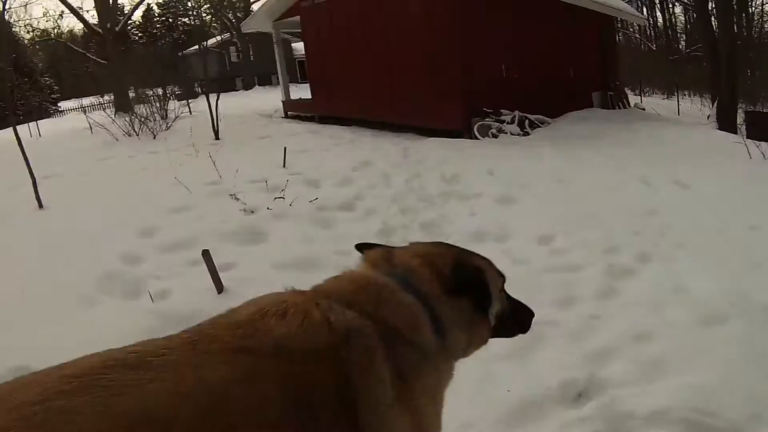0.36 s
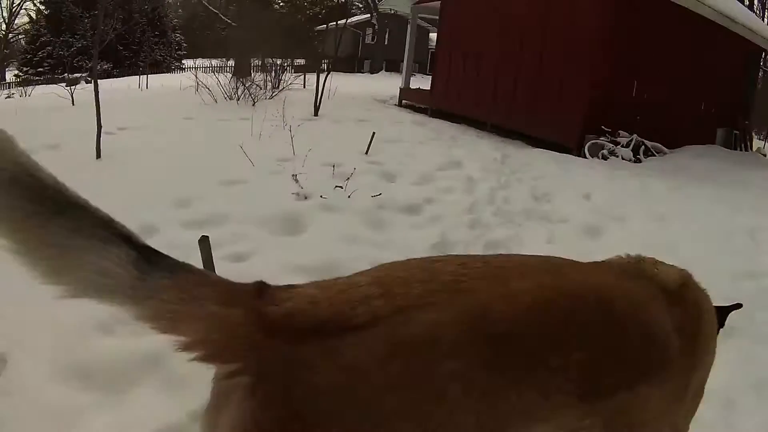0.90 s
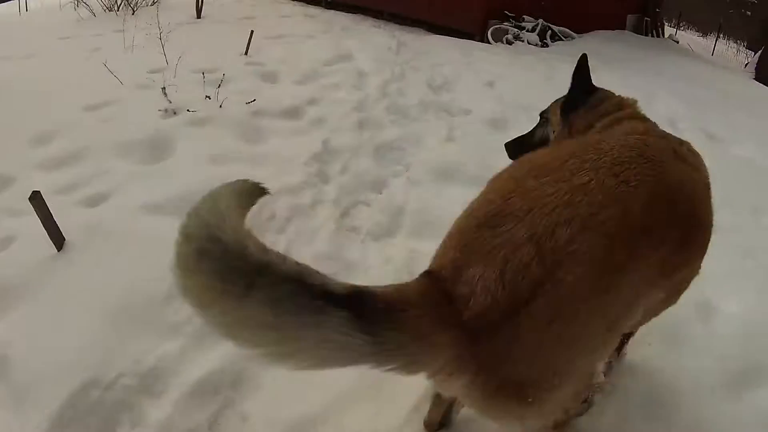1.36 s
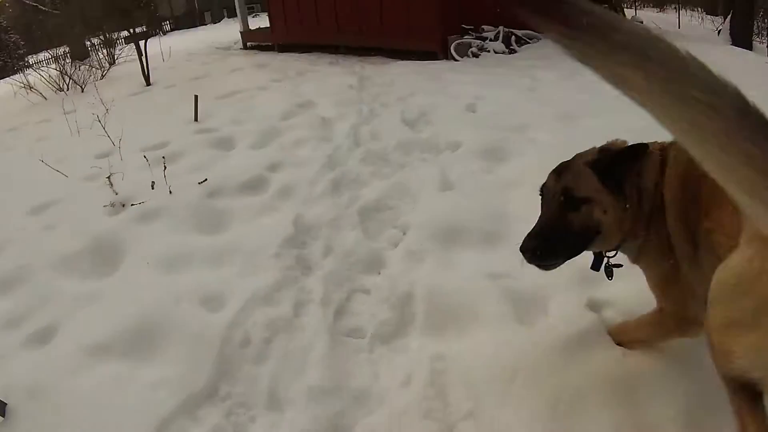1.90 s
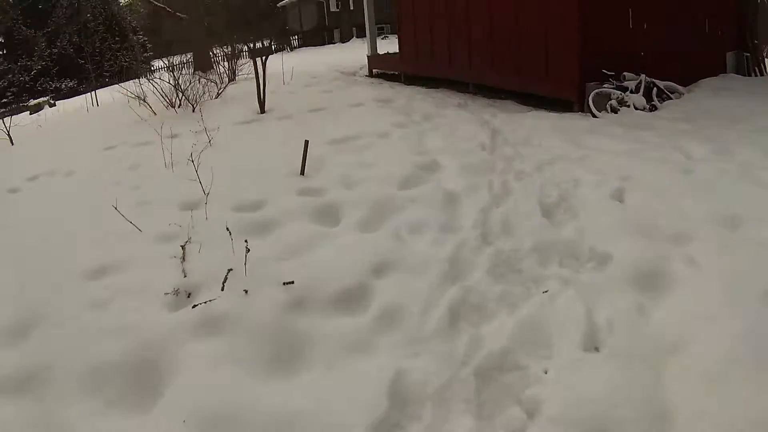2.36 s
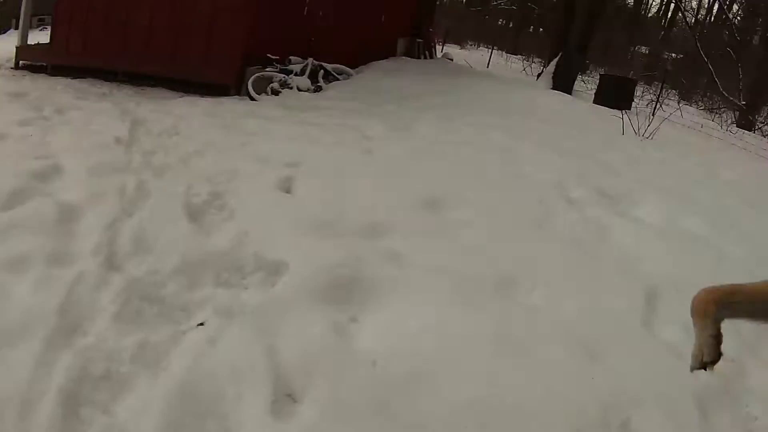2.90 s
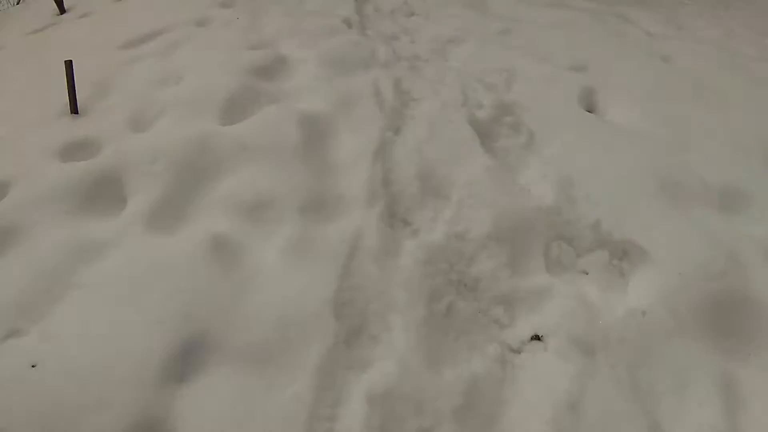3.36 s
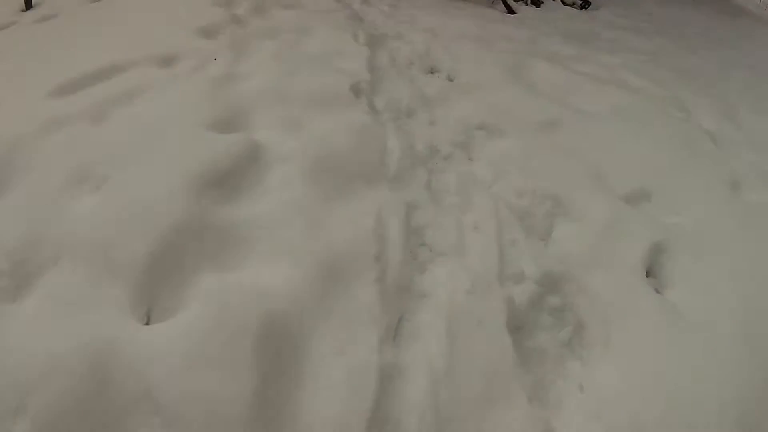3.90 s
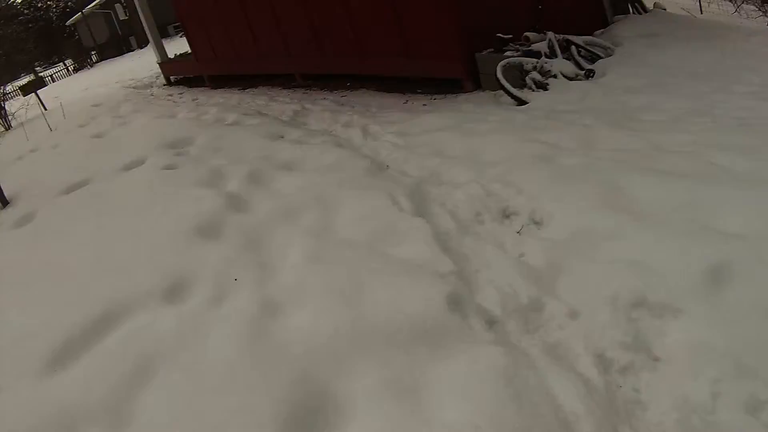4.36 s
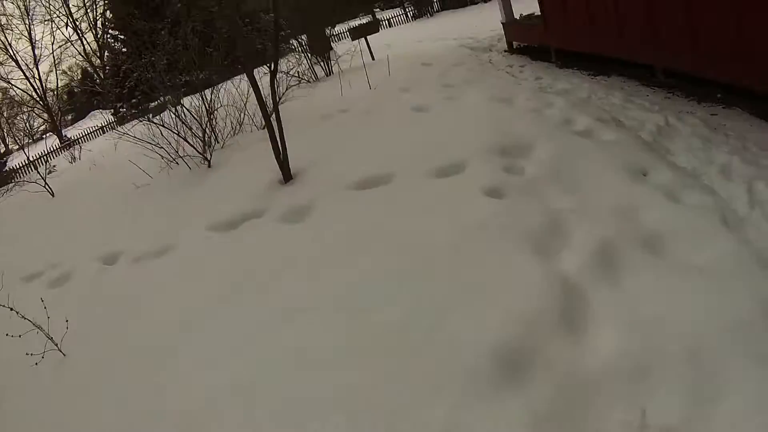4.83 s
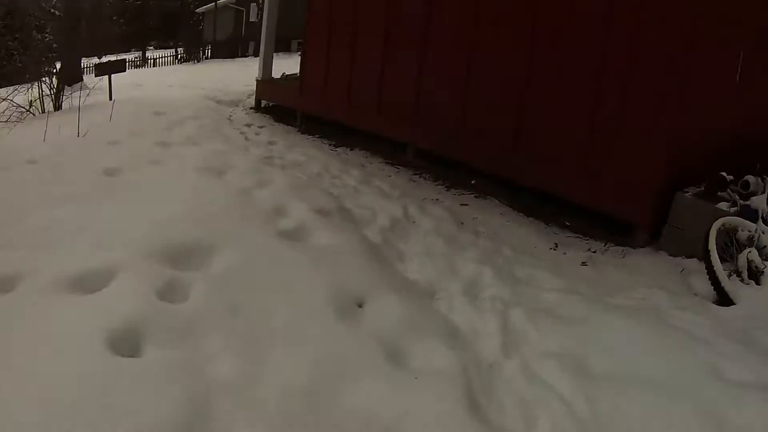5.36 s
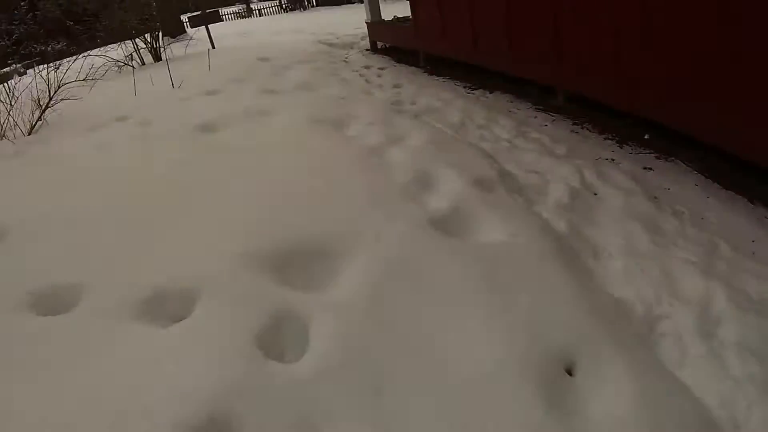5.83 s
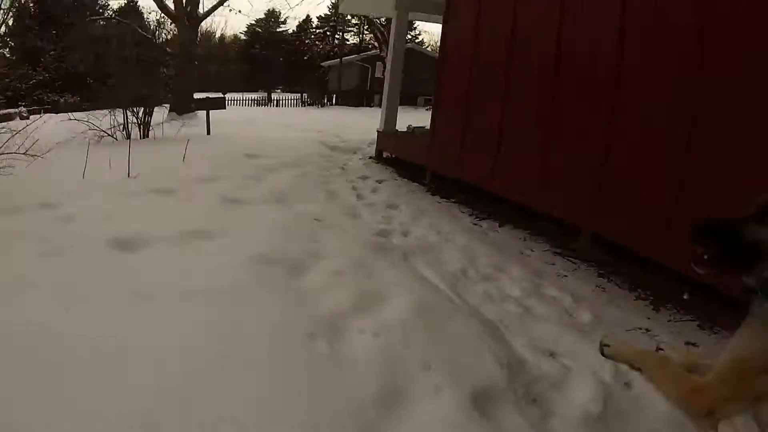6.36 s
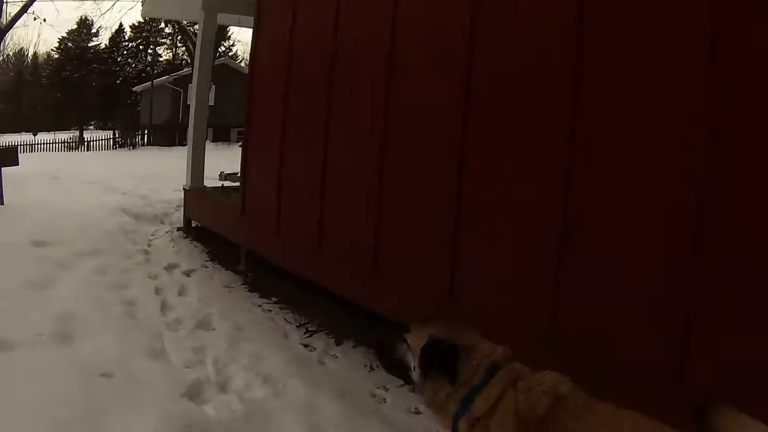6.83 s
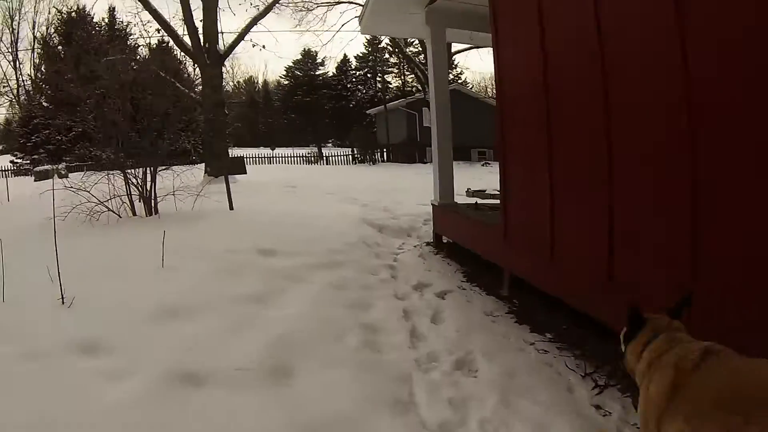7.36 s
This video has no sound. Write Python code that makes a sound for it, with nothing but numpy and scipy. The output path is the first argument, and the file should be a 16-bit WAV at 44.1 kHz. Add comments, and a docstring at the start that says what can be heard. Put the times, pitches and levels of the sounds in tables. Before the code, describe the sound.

A snowy walk beside a dog, at half speed with natural pitch, so every sound is slightly stretched and fluttering, repeating in tiny pieces about fourteen times a second. The microphone sits inside a closed plastic housing held in the hand: boxy, resonant, muffled, with faint hiss. From 0 to 1.2 s there are soft crunches, a strong gritty one at about 0.57 s, and low bumps. It is calmer until a fuller crunch near 1.9 s, with very faint high tag tinkles around 2 s. From 2.4 s crunches thicken; a big bass heave comes at 2.8 s and a hard clack at 3.2 s. After a lull around 3.5 s, knocks and crisp crunches crowd 4.2-5.3 s. A sharp clack at 5.7 s joins tinkling tags and a heavy low bump at 5.85 s. Crunches and thumps continue past 6.4 s, briefly ease, then return around 7.1 s with a hollow tap.

```python
"""Walking a dog over crusted snow, at half speed

Someone walks beside a dog with a small camera in a closed plastic housing in hand. Noise grains make the snow,
clicks make knocks, short tones make gritty bursts, taps, thumps and tinkling collar tags.
Resonances colour snow and knocks as the housing does; low noise swells as the hand moves it.
Half speed keeps the pitch: about every 71 ms playback steps back and repeats a piece."""
import sys
import numpy as np
from scipy import signal
from scipy.io import wavfile

SR = 44100
rng = np.random.default_rng(int(sys.argv[2]) if len(sys.argv) > 2 else 0)


def inscribe(sig):
    """Save sig as 16-bit PCM at rate SR to the path in sys.argv[1].

    A 1-D sig is mono; a 2-D sig holds one channel per row.
    Samples are clipped to [-1, 1] before scaling.
    """
    pcm = np.round(np.clip(np.atleast_2d(sig).T, -1, 1) * 32767)
    wavfile.write(sys.argv[1], SR, pcm.astype(np.int16))


def nominal_scale(level):
    """Amplitude ratio for a level in decibels (scalar or array-like)."""
    x = np.asarray(level, float) / 20
    return 10 ** x


N = 329868

# Event times in the tables are heard in the slowed sound; holds and lengths are at real speed.
# Levels are those before the soft overload in record().
FIRST_SPLICE_S, SPLICE_EVERY_S, FADE_S = .0849, .07133, .012
SPLICES_S = np.arange(FIRST_SPLICE_S, N / SR, SPLICE_EVERY_S)
STRUCK_WIDER = 1.44   # widens every resonance that is rung twice


def rms_one(x):
    """Scale to an average strength (rms) of 1."""
    return x / np.sqrt(np.mean(x ** 2) + 1e-20)


def band(x, low_hz, high_hz, order=2):
    """Keep only the pitches between two limits (Butterworth band-pass)."""
    return signal.sosfilt(signal.butter(order, [low_hz, high_hz], "band", fs=SR, output="sos"), x)


def drift(rate_hz):
    """Slow random wander of rms 1, from noise smoothed twice."""
    r = np.exp(-2 * np.pi * rate_hz / SR)
    wander = signal.lfilter([1], [1, -2 * r, r * r], rng.standard_normal(N + SR))
    return rms_one(wander[SR:])   # skip the first second, while the filter settles


def even(x, evenness):
    """Flatten the swells of a narrow noise."""
    wave = signal.hilbert(x)
    return wave.real / np.abs(wave) ** evenness


def real_time(s):
    """Moment in the real-speed scene that plays at slowed time s."""
    return s - behind()[np.searchsorted(SPLICES_S + FADE_S / 2, s)]


def clicks(rows, db):
    """One single-sample click per row, in scene time."""
    out = np.full(N, 1e-18)
    at = (real_time(np.array(rows)[:, 0]) * SR).astype(int)
    out[at] = nominal_scale(db)
    return out


def rings(rows, t60_s, rise_s):
    """Short tones, each at its own pitch, that fade by 60 dB in t60_s."""
    out, t = np.zeros(N), np.arange(SR // 10) / SR
    for s, db, hz in rows:
        at = int(real_time(s) * SR)
        fading = nominal_scale(db - 60 * t / t60_s) * np.minimum(t / rise_s, 1)
        out[at:at + len(t)] += fading * np.sin(2 * np.pi * hz * t)
    return out


def swells(rows, rests_db, rise_s, fall_s):
    """Level in dB per column: rows rise, hold and fall (20 dB per rise_s or fall_s); powers add to a rest."""
    s, hold, *columns = np.transpose(rows)
    t = np.arange(0, N / SR, .001)
    since = t[:, None] - real_time(s)
    rise = np.minimum(since, 0) / rise_s
    fall = np.maximum(since - hold, 0) / fall_s
    shape_db = 20 * (rise - fall)
    levels_db = []
    for db, rest in zip(columns, rests_db):
        power = nominal_scale(2 * rest) + nominal_scale(2 * (db + shape_db)).sum(axis=1)
        levels_db.append(np.interp(np.arange(N) / SR, t, 10 * np.log10(power)))
    return levels_db


def housing(x, modes, struck=False, wander_db=0, twice=False, lag_s=0):
    """Resonances side by side; rung twice, each is steeper and slower to start."""
    out = 0
    for k, (hz, width, *levels_db, polarity) in enumerate(modes):
        r = np.exp(-np.pi * width * (STRUCK_WIDER if twice else 1) / SR)
        b, a = [(1 - r * r) / 2, 0, (r * r - 1) / 2], [1, -2 * r * np.cos(2 * np.pi * hz / SR), r * r]
        # rung once, neighbours of like polarity cancel between their peaks and leave a notch
        sign = (-1) ** k if twice else np.sign(polarity)
        gain = sign * nominal_scale(levels_db[-1 if struck else 0])
        # each resonance is fed unevenly as the grains change
        fed = x * nominal_scale(wander_db * drift(18.5)) if wander_db else x
        rung = signal.lfilter(b, a, fed)
        if twice:
            rung = signal.lfilter(b, a, rung)
        out = out + gain * rung
    return np.roll(out, round(lag_s * SR))


# Middle resonances of the housing, for sound through air:
# (pitch [Hz], width [Hz], level [dB], polarity [+1 or -1])
MID_MODES = [(531.4, 26, -4.5, 1), (720, 120, -12, 1), (1105, 82, -3, 1), (1560, 228, -8.5, -1),
             (1992, 221, -1.5, -1), (2347, 219, 3, 1), (2555, 440, -8, -1)]
# Upper and top resonances of the housing, for crunch and for knocks:
# (pitch [Hz], width when rung once [Hz], level through air [dB], level when struck [dB],
#  polarity when rung once [+1 or -1])
HIGH_MODES = [(2980, 200, -25, -1.5, -1), (3687, 138, 7.5, -10.5, 1), (3700, 210, -6.5, 1.5, 1),
              (4730, 350, -4, -1, 1), (5260, 610, -5.5, -14, -1), (7250, 960, -17, -21, -1),
              (7980, 380, -12.5, -42, 1)]
TOP_MODES = [(11200, 350, 5, -30, 1), (11420, 670, -32, -23.5, 1), (12900, 550, -11.5, -35, -1)]
# Boots and paws press the snow, cloth swishes:
# (time [s], hold [s], crunch level [dB], crisp edge level [dB], swish level [dB])
STEPS = [(.2, 0.0052, -51, -67, -84), (.08, 0.04, -48.5, -63, -85), (.4, 0.022, -70, -80, -92),
         (.515, 0.011, -54, -63, -81), (.562, 0.021, -33, -42, -74), (.71, 0.097, -50, -59, -93),
         (.84, 0.011, -64, -67, -81), (.91, 0.012, -39, -49.5, -79), (1.04, 0.056, -45.5, -55.5, -90),
         (1.12, 0.037, -40, -49, -74), (1.44, 0.044, -47.5, -54.5, -79), (1.66, 0.042, -49, -55.5, -92),
         (1.93, 0.067, -33.5, -44.5, -74), (2.431, 0.057, -40.5, -50.5, -76), (2.56, 0.0058, -33, -45, -67),
         (2.704, 0.027, -33, -43, -77), (2.8, 0.032, -41.5, -50.5, -78), (2.97, 0.034, -35, -46.5, -88),
         (3.146, 0.064, -33.5, -44.5, -72), (3.3, 0.1, -49, -58, -88), (3.6, 0.069, -43.5, -55.5, -86),
         (3.79, 0.018, -44, -71, -89), (3.88, 0.048, -38, -48, -74), (4.1, 0.05, -37.5, -45, -70),
         (4.255, 0.024, -41.5, -50.5, -88), (3.98, 0.024, -43.5, -52, -84), (4.41, .02, -50, -50.5, -84),
         (4.485, 0.017, -31, -42, -66), (4.565, 0.0028, -26.5, -38.5, -60),
         (4.72, 0.069, -30.5, -38.5, -68.5), (4.64, 0.021, -36.5, -52, -87), (4.93, 0.045, -46, -67, -91),
         (5.05, .02, -46, -50, -80), (5.115, 0.011, -31.5, -42.5, -63), (5.187, 0.039, -32.5, -40.5, -71),
         (5.502, 0.0021, -37.5, -51, -75), (5.645, .005, -48, -58, -78), (5.789, 0.0025, -35, -43.5, -81),
         (5.912, 0.0068, -42, -56, -83), (6.03, 0.046, -42.5, -53, -92), (6.149, 0.037, -33.5, -43, -75),
         (6.42, 0.049, -36, -46, -73), (6.55, 0.13, -42.5, -50.5, -75.5), (6.28, 0.064, -41, -49, -78),
         (6.987, 0.0042, -44.5, -46.5, -76), (7.12, 0.025, -35, -43, -70.5), (5.72, 0.039, -37, -44.5, -84),
         (7.19, 0.014, -41, -55, -80), (7.3, 0.14, -48, -55.5, -79.5)]


def crunch():
    """Snow grains break in clumps over a hiss of rubbing; all of it is heard through the housing."""
    crunch_db, crisp_db, swish_db = swells(STEPS, [-47.5, -61.5, -91.5], rise_s=0.045, fall_s=0.047)
    sizes = nominal_scale(1.4 * np.minimum(rng.exponential(1, N), 5)) * rng.choice([-1, 1], N)
    born = rng.random(N) < 1500 * nominal_scale(3.0 * drift(40)) / SR   # about 1500 grains a second, in clumps
    rubbing = 1.01 * rng.standard_normal(N)
    grains = (rms_one(sizes * born) + rubbing) * nominal_scale(2.23 * drift(4.7))
    # lone crackles of crust among the grains, 120 a second on average
    crackles = nominal_scale(2.5 * np.minimum(rng.exponential(1, N), 3)) * (rng.random(N) < 120 / SR)
    grains = grains + 0.49 * rms_one(crackles)
    mid = band(housing(grains, MID_MODES, wander_db=2), 250, 4360)
    high = band(housing(grains, HIGH_MODES, wander_db=2), 1500, 8600, order=4)
    swish = band(housing(rng.standard_normal(N), TOP_MODES), 10400, 13500)
    crisp_db = crisp_db + 0.35 * drift(41.0)
    swish_db = swish_db + 4.1 * drift(30) + 1.7 * drift(11.0)
    return nominal_scale(crunch_db) * rms_one(mid) + nominal_scale(crisp_db) * rms_one(high) + nominal_scale(swish_db) * rms_one(swish)


# Short gritty bursts that each ring on one housing pitch:
# (time [s], length [s], peak level before the grit [dB], pitch [Hz])
GRIT_BURSTS = [(0.333, 0.039, -40.5, 1550), (0.429, 0.013, -38, 1480), (0.571, 0.015, -20.5, 2316),
               (.571, 0.022, -26.5, 1137), (0.574, 0.018, -38, 5170), (0.568, .02, -33, 3620),
               (0.779, 0.017, -36, 1526), (3.143, .016, -20, 2100), (3.144, 0.018, -27.5, 1160),
               (4.561, 0.019, -41.5, 6790), (4.562, 0.02, -36.5, 4940), (4.774, 0.012, -26, 2300),
               (5.618, 0.021, -38.5, 1604), (5.77, 0.034, -23.5, 2156), (3.327, .022, -49, 5300),
               (6.201, 0.018, -31, 1560), (7.088, 0.013, -39, 1110), (7.114, 0.02, -27.5, 2280)]


def grit_bursts():
    """Tones that swell and fade within their length, with a gritty level."""
    out = np.zeros(N)
    for s, length, db, hz in GRIT_BURSTS:
        at, t = int(real_time(s) * SR), np.arange(int(length * SR)) / SR
        swell = nominal_scale(db) * np.sin(np.pi * t / length)
        out[at:at + len(t)] += swell * np.sin(2 * np.pi * hz * t)
    grit = 0.55 + 0.4 * drift(160)
    return out * grit


# What a sharp blow rings with; sharp_attacks() uses the same rows but the first, all without delay:
# (pitch [Hz], width [Hz], level [dB], start after the blow [ms], polarity [+1 or -1])
CLACK_MODES = [(736, 125, -7.5, 0, 1), (1148, 190, 2.5, .02, -1), (1544, 245, 3, .36, -1),
               (2022, 172, 7, .9, -1), (2353, 278, 2, .93, 1)]


def clack(blow):
    """Each resonance rings twice over, most of the upper ones a little later than the lowest."""
    out = 0
    for hz, width, db, lag_ms, polarity in CLACK_MODES:
        mode = [(hz, width / STRUCK_WIDER, db, 1)]   # undoes the widening, so the table's width holds
        out = out + polarity * housing(blow, mode, twice=True, lag_s=lag_ms / 1000)
    return out


# Low resonances of the housing, and the single one that a thump rings:
# (pitch [Hz], width [Hz], level through air [dB], level when struck [dB], polarity [+1 or -1])
LOW_MODES = [(520, 91, 0, 1, 1), (766, 65, -1.5, -1.5, -1), (1160, 106, -3, 5.5, -1)]
THUMP_MODE = [(214, 130, 0, 0.0093, 1)]
# Knocks on the housing, levels relative within each column:
# (time [s], sharp part [dB], dull part [dB], crisp part [dB], thump [dB])
KNOCKS = [(0.2134, -63, -33.5, -56, -28), (0.511, -53, -58, -64, -42), (0.6781, -28, -37, -62, -25.5),
          (1.149, -45, -34, -58, -32), (2.0995, -71, -72, -56, -38), (2.5376, -22, -55, -36, -57),
          (2.705, -36, -45, -42, -49), (2.9363, -31, -21, -50, -21.5), (3.012, -50, -52, -50, -43),
          (3.2191, -12.5, -55, -20, -38), (3.7803, -32.5, -58, -51, -31), (4.214, -37, -31, -66, -33),
          (4.3624, -9, -60, -25, -27), (4.435, -33, -56, -51, -41), (4.4816, -15, -48, -43, -28),
          (4.6632, -15.5, -21, -38, -15), (4.9492, -28, -51, -53, -27.5), (5.109, -33, -49, -34, -24),
          (5.1747, -21, -31, -46, -37), (5.239, -16.5, -23, -34, -22.5), (5.5058, -30, -28.5, -53, -31),
          (5.5836, -42.5, -69, -55, -46), (5.7122, -7, -58, -16.5, -29), (5.849, -50, -40, -60, -20),
          (5.873, -27, -32.5, -42, -24), (5.9905, -35, -31.5, -67, -30), (5.9934, -41, -31.5, -60, -27),
          (6.1826, -27, -32.5, -56, -36), (6.4521, -22.5, -26.5, -48, -50), (7.097, -35, -49, -57, -37),
          (7.2128, -41, -57, -44, -29)]


def knocks():
    """A click and a rattle of a few ms; the soft push rings the low resonances, the edge the upper ones."""
    s, sharp_db, dull_db, crisp_db, thump_db = np.transpose(KNOCKS)
    fade = np.exp(-2 * np.pi * 80 / SR)
    rough = 0.19 * rng.standard_normal(N)

    def blow(db, rattle_share):
        """A click plus noise that dies away after it."""
        click = clicks(KNOCKS, db)
        return click + signal.lfilter([1], [1, -fade], click) * rough * rattle_share

    sharp = clack(blow(sharp_db + 28.5, 0.25))
    dull = housing(blow(dull_db + 40.5, 0.23), LOW_MODES, struck=True)
    # a blow stirs these modes later than the lower ones
    crisp = housing(blow(crisp_db + 28.5, 0.55), HIGH_MODES + TOP_MODES, struck=True, twice=True, lag_s=0.00133)
    thump = housing(blow(thump_db + 38.0, 0.5), THUMP_MODE, struck=True)
    return band(sharp, 590, 3900) + band(dull, 280, 1060) + band(crisp, 2840, 13000) + band(thump, 101, 520)


# Sharp attacks of the hardest knocks on the housing: (time [s], relative level [dB])
SHARP_ATTACKS = [(3.22, -16), (4.4823, -30), (4.664, -22), (5.1748, -19), (5.2395, -13.5)]


def sharp_attacks():
    """The attack starts every resonance at the same instant."""
    modes = [(hz, width, db, polarity) for hz, width, db, lag_ms, polarity in CLACK_MODES[1:]]
    modes = modes + [(3820, 300, -5, 1)]
    blow = clicks(SHARP_ATTACKS, np.array(SHARP_ATTACKS)[:, 1] + 21.5)
    return band(housing(blow, modes), 660, 4500)


# Hollow taps on the housing: (time [s], level [dB])
TAPS = [(7.2115, -21), (7.2894, -50), (7.3507, -43)]
# What every tap rings with: (pitch [Hz], level against the tap [dB], time to fade by 60 dB [s])
TAP_MODES = [(245, 0, 0.063), (732, -8, 0.05), (1150, -13, .06), (2600, -4.5, 0.017)]


def taps():
    """Every tap rings the same few fading tones."""
    out = 0
    for hz, level_db, t60_s in TAP_MODES:
        rows = [(s, db + level_db, hz) for s, db in TAPS]
        out = out + rings(rows, t60_s, rise_s=0.00052)
    return out


# The dog's collar tags tinkle: (time [s], level before rise and fade [dB], pitch [Hz])
TAGS = [(1.935, -54, 12900), (2.0064, -42, 12900), (2.0068, -43, 12300), (2.09, -52, 13000),
        (5.5588, -47, 12900), (5.7114, -34, 12600), (5.7897, -44, 12800), (5.8646, -43, 13000),
        (6.6463, -45, 13100)]


def tags():
    """The tags give very short, very high tones."""
    return rings(TAGS, t60_s=0.016, rise_s=0.002)


# Soft low thumps of the grip: (time [s], level before rise and fade [dB], pitch [Hz])
THUMPS = [(.505, -32, 148), (.552, -31, 186), (.572, -24, 137), (4.663, -30.5, 397), (5.838, -25, 263.5),
          (6.412, -30, 135), (6.482, -38, 463)]


def thumps():
    """Low tones that start softly and fade by 60 dB in 0.13 s."""
    return rings(THUMPS, t60_s=0.13, rise_s=0.0069)


# The hand swings or jerks the housing: (time [s], hold [s], heave level [dB])
HEAVES = [(.085, 0.0054, -24), (.143, 0.0034, -20), (.3, 0.023, -29), (.5, 0.015, -21), (.583, 0.0255, -14),
          (.76, 0.007, -23.5), (.92, 0.029, -22), (1.1, 0.078, -29.5), (1.5, 0.031, -33),
          (1.87, 0.071, -23), (2.21, 0.0015, -33), (2.425, 0.0039, -42.5), (2.6, 0.012, -31),
          (2.7, 0.016, -21.5), (2.77, 0.011, -5), (2.919, 0.0084, -16), (3.056, 0.025, -16),
          (3.283, 0.0032, -15), (3.335, 0.012, -13), (3.577, 0.0012, -20.5), (3.8, 0.073, -27),
          (4.1, 0.049, -26.5), (4.249, 0.0061, -17), (4.434, 0.0033, -18), (4.558, 0.049, -17.5),
          (4.84, 0.09, -22.5), (5.13, 0.034, -19), (5.356, 0.0017, -26), (5.547, 0.064, -36),
          (5.79, .01, -35), (5.85, 0.01, -8), (6.145, 0.0021, -13.5), (6.3, 0.027, -28),
          (6.433, 0.0024, -11.5), (6.789, 0.0022, -24.5), (7.0, 0.031, -37), (7.125, 0.0046, -14.5),
          (7.258, 0.0039, -22.5), (7.356, 0.02, -27.5)]


def heaves():
    """Slow pressure swings of the handled housing, made from evened-out deep noise."""
    heave_db, = swells(HEAVES, [-38.5], rise_s=0.058, fall_s=0.036)
    deep = even(band(rng.standard_normal(N), 14.64, 35.1), evenness=0.68)
    return nominal_scale(heave_db) * rms_one(band(deep, 13.8, 50, order=1))


# Tone of the dull thud: (pitch [Hz], level [dB])
THUD = [(150, 2.5), (250, -5), (400, -11.5), (800, -17.5), (1200, -25)]


def thud(db):
    """Dull lumpy rumble from steps and grip, in half-octave bands of noise."""
    hz, level = np.transpose(THUD)
    white, out = rng.standard_normal((2, N)), 0
    edges = 140 * 2 ** np.arange(0, 3.6, .5)
    for k, (low, high) in enumerate(zip(edges, edges[1:])):
        band_db = np.interp(np.log(low * high) / 2, np.log(hz), level)
        out = out + nominal_scale(band_db) * band(white[k % 2], low, high)   # neighbours use separate noises
    return nominal_scale(db + 2.66 * drift(39)) * rms_one(out)


# Jolts through the grip: (time [s], hold [s], bump level [dB], thud level [dB])
JOLTS = [(.215, 0.0034, -29, -46), (.583, 0.0035, -24, -31.5), (.791, 0.0064, -32, -43),
         (1.151, 0.0012, -33.5, -42), (1.719, 0.0043, -39.5, -46), (1.913, 0.11, -38.5, -51),
         (2.294, 0.0046, -60, -61), (2.542, 0.098, -34, -47), (2.704, 0.031, -22.5, -34),
         (2.985, 0.002, -22, -31), (3.138, 0.024, -31, -37), (3.221, 0.0059, -24, -33),
         (3.4, 0.01, -38, -48), (3.687, 0.0093, -35.5, -45), (3.845, 0.063, -39, -44.5),
         (4.056, 0.012, -36, -49.5), (4.199, 0.041, -35.5, -40.5), (4.434, .01, -29.5, -45),
         (4.558, 0.022, -24, -31.5), (4.72, 0.07, -33, -36.5), (4.927, 0.045, -32.5, -42),
         (5.13, 0.045, -29.5, -34.5), (5.486, 0.037, -34, -41.5), (5.755, 0.0029, -37, -41),
         (5.845, 0.0047, -19, -31.5), (6.001, 0.0026, -41, -35), (6.065, 0.0046, -25, -61),
         (6.16, 0.073, -34.5, -41.5), (6.357, 0.011, -31, -39.5), (6.433, 0.037, -25.5, -34),
         (6.789, 0.054, -43.5, -45.5), (7.125, 0.0067, -25, -36), (7.258, 0.0031, -45, -37),
         (7.338, 0.0091, -34.5, -67)]


def jolts():
    """Quick bass bumps on top of the heaves, each with a dull thud."""
    bump_db, thud_db = swells(JOLTS, [-44, -51], rise_s=0.047, fall_s=0.043)
    quick = even(band(rng.standard_normal(N), 36, 175.0), evenness=0.74)
    return nominal_scale(bump_db) * rms_one(band(quick, 58.0, 113.3)) + thud(thud_db)


def hiss():
    """Faint steady microphone hiss."""
    return nominal_scale(-66.5) * rms_one(band(rng.standard_normal(N), 3150, 6500, order=1))


def scene():
    """The walk at its real speed; its events fill the first half of the array."""
    snow = crunch()
    contacts = grit_bursts() + knocks() + sharp_attacks() + taps() + tags()
    handling = thumps() + heaves() + jolts()
    return (snow + contacts + handling)[None]


# Splices that do not step back by half their spacing: (time [s], step back [ms])
ODD_SPLICES = [(.228, 23.74), (.37, 47.55), (.442, 29.57), (.513, 43.74), (.656, 21.66), (.727, 49.61),
               (1.94, 41.61), (2.011, 40.61), (2.51, 21.72), (2.653, 42.34), (2.724, 28.28), (2.938, 43.85),
               (3.009, 30.5), (3.081, 46.46), (3.152, 21.7), (3.223, 49.57), (3.295, 21.7), (3.366, 49.61),
               (4.222, 23.72), (4.293, 47.55), (4.507, 27.01), (4.579, 31.81), (4.65, 34.42),
               (4.793, 43.74), (4.935, 41.09), (5.078, 26.55), (5.149, 30.95), (5.221, 49.39),
               (5.292, 21.66), (5.506, 30.91), (5.577, 41.95), (5.72, 28.68), (5.791, 43.9), (6.148, 27.3),
               (6.219, 30.23), (6.291, 47.19), (6.433, 22.88), (7.004, 47.62), (7.075, 22.29),
               (7.218, 36.35)]


def behind():
    """How far playback lags the clock after each splice, in seconds."""
    s, back_ms = np.transpose(ODD_SPLICES)
    back = np.full(len(SPLICES_S), SPLICE_EVERY_S / 2)
    odd = np.round((s - FIRST_SPLICE_S) / SPLICE_EVERY_S).astype(int)
    back[odd] = back_ms / 1000
    return np.cumsum(np.r_[0, back])


def half_speed(x):
    """At each splice the running sound fades into a reading that lies one step further back."""
    t, lag = np.arange(N) / SR, behind()
    piece = np.searchsorted(SPLICES_S, t)
    since = t - np.r_[-1, SPLICES_S][piece]
    new = np.clip(since / FADE_S, 0, 1)

    def read(k):
        """The scene as heard with the lag of piece k."""
        return x[:, np.round((t - lag[k]) * SR).astype(int)]

    return new * read(piece) + (1 - new) * read(np.maximum(piece - 1, 0))


def band_limit(x):
    """A steep low-pass at the top of the band."""
    return signal.sosfilt(signal.butter(12, 13980, fs=SR, output="sos"), x)


def record(dry):
    """Hiss joins, big swings overload softly, then the sound is slowed."""
    overloaded = 1.6 * np.tanh((dry + hiss()) / 2.0)   # quiet sound passes at 0.8 of its size
    return band_limit(half_speed(overloaded))


dry = scene()
out = record(dry)
inscribe(out)
```